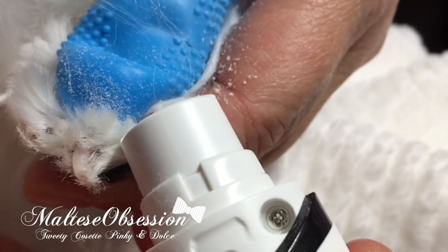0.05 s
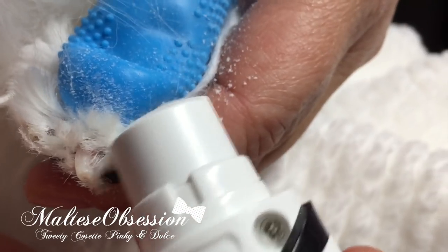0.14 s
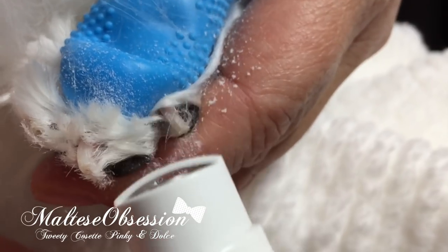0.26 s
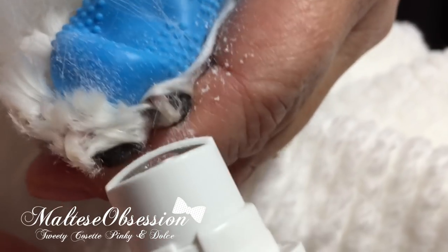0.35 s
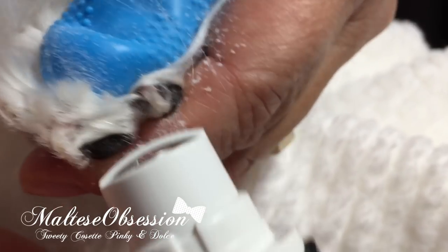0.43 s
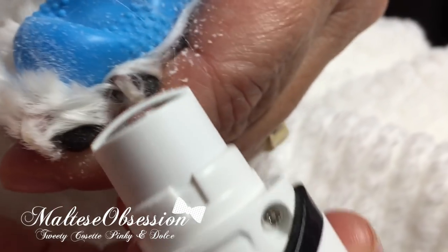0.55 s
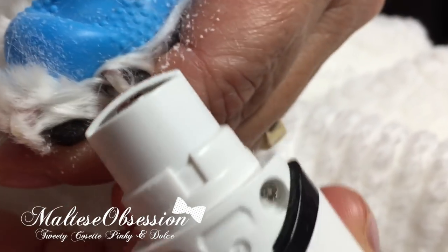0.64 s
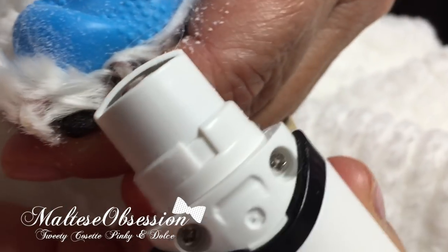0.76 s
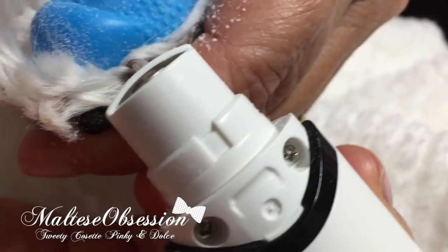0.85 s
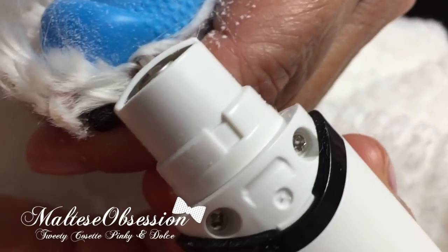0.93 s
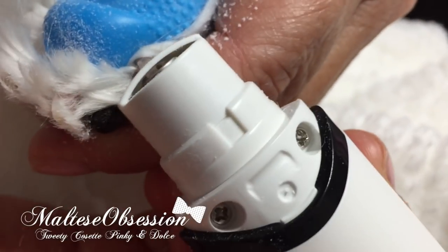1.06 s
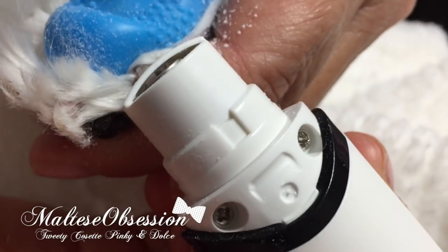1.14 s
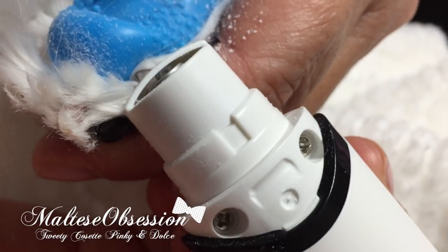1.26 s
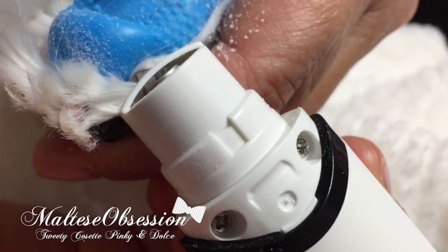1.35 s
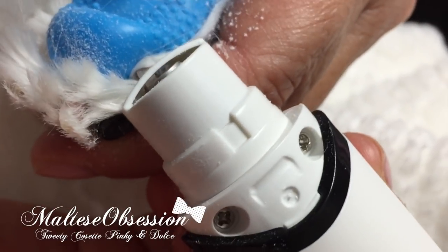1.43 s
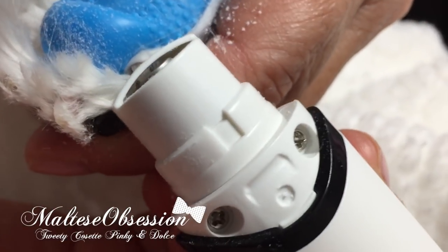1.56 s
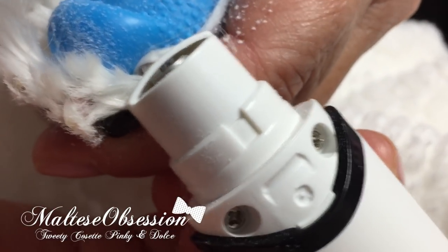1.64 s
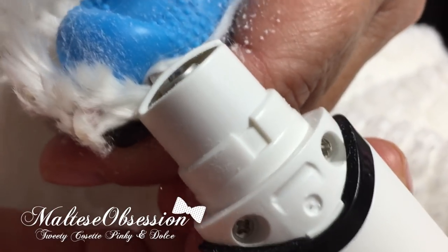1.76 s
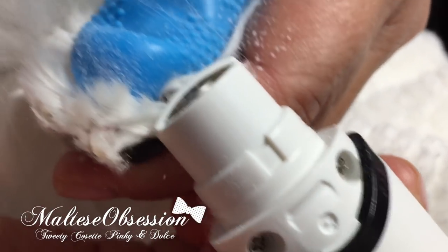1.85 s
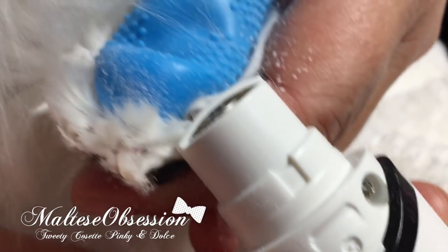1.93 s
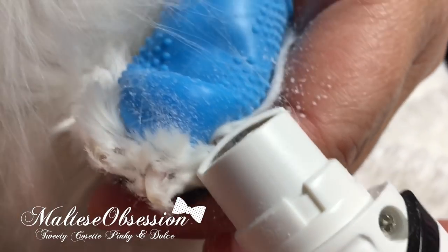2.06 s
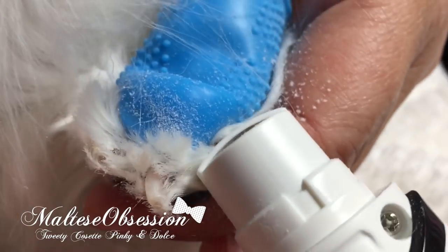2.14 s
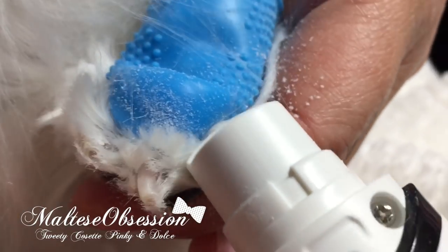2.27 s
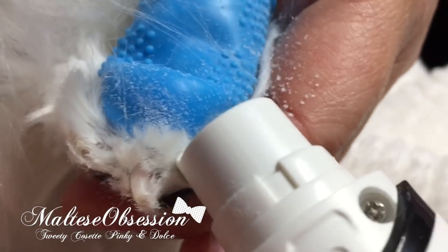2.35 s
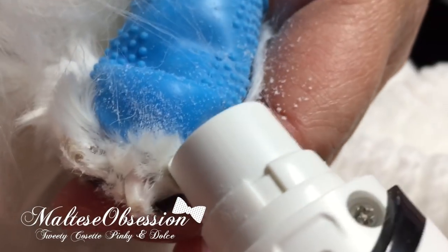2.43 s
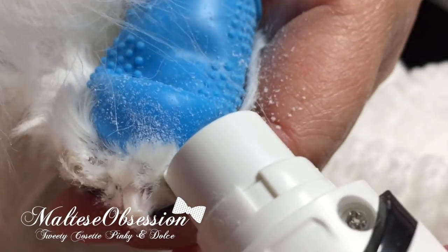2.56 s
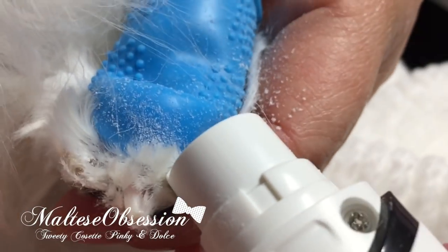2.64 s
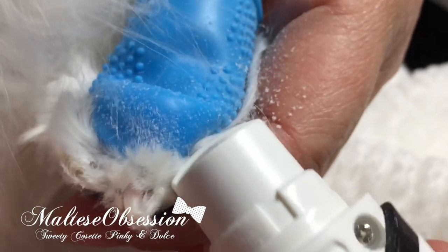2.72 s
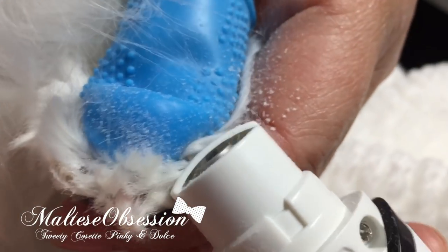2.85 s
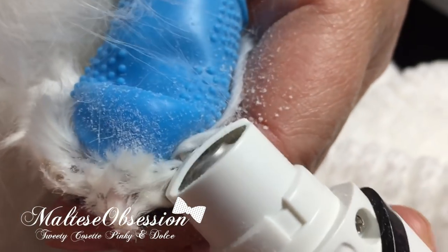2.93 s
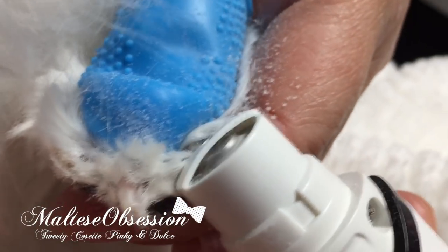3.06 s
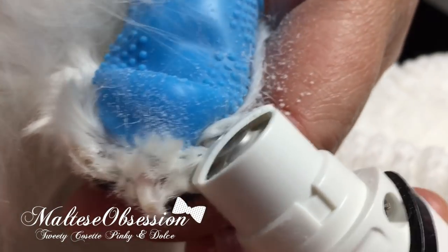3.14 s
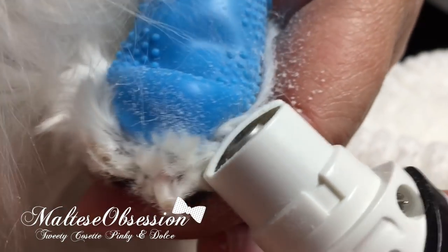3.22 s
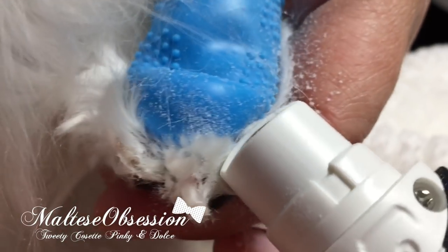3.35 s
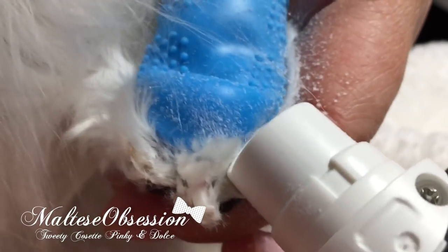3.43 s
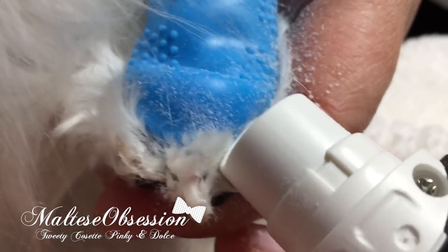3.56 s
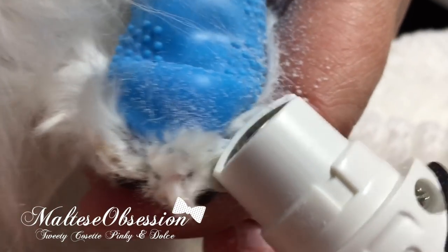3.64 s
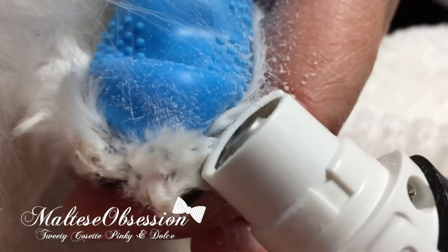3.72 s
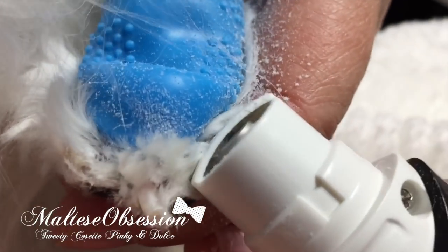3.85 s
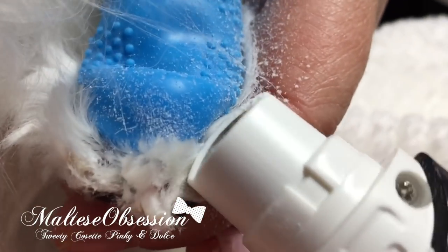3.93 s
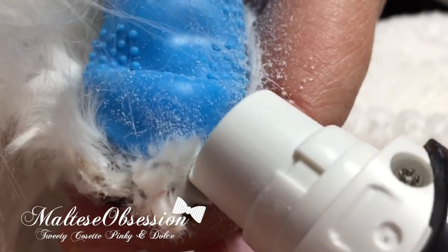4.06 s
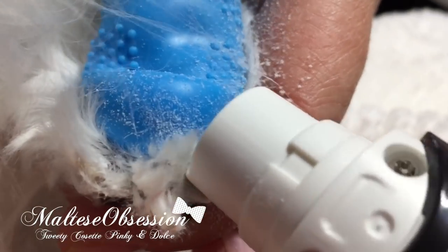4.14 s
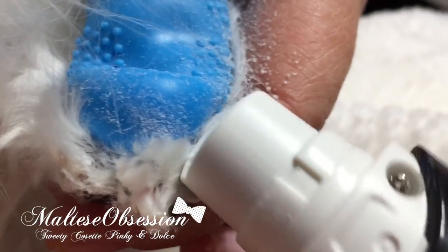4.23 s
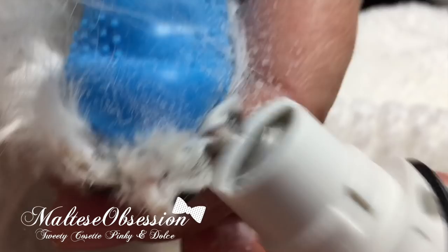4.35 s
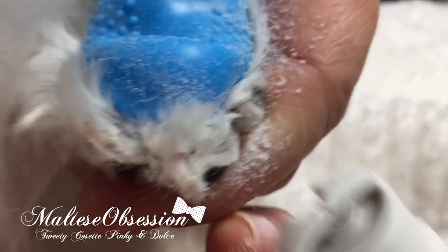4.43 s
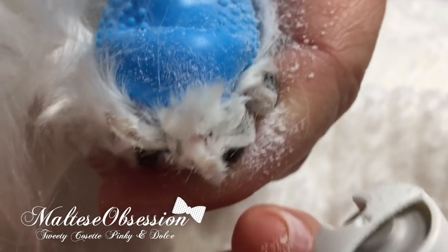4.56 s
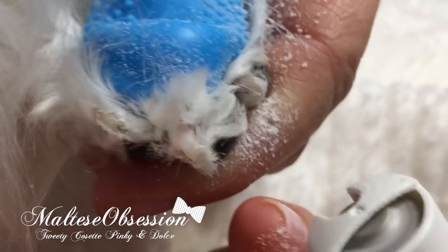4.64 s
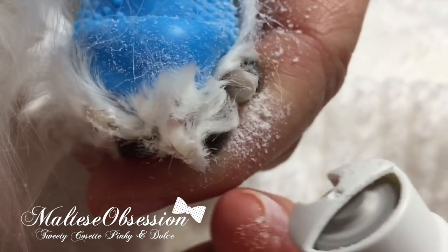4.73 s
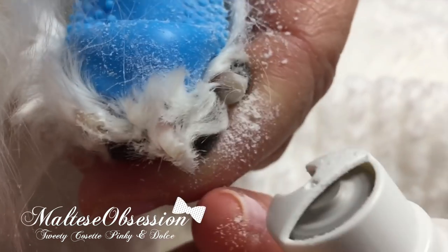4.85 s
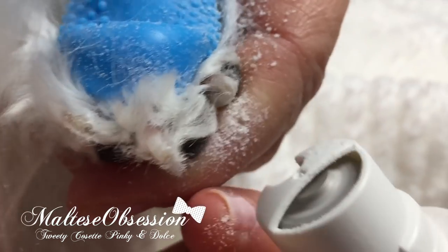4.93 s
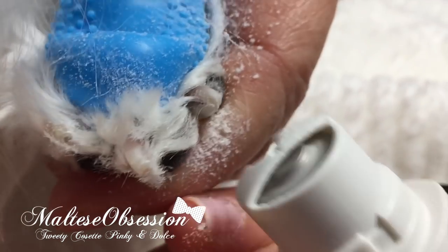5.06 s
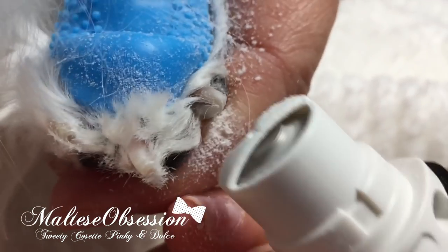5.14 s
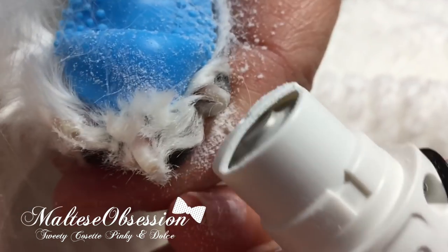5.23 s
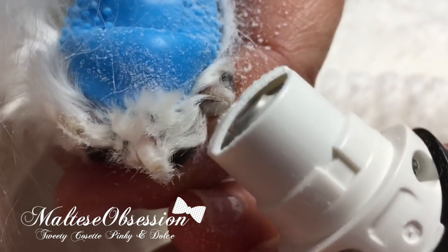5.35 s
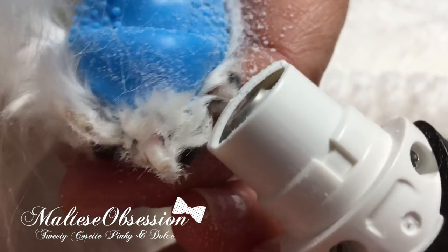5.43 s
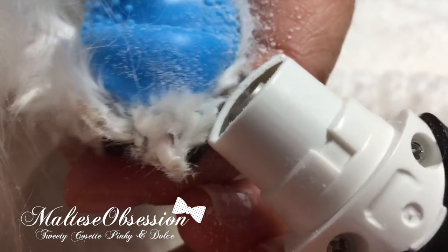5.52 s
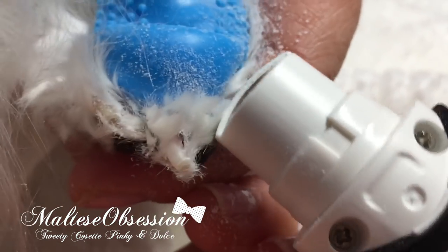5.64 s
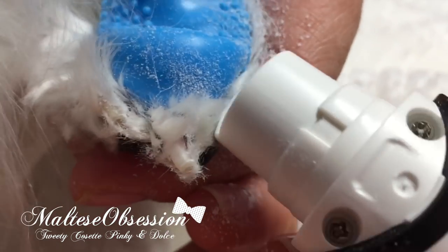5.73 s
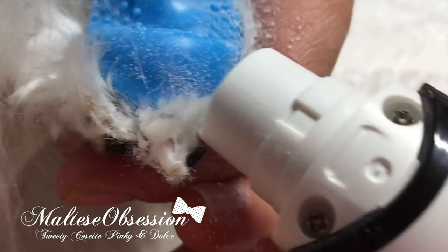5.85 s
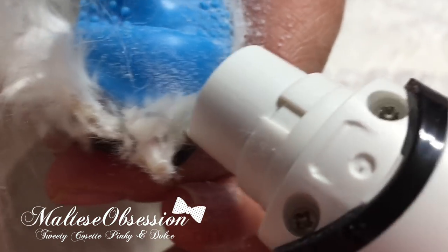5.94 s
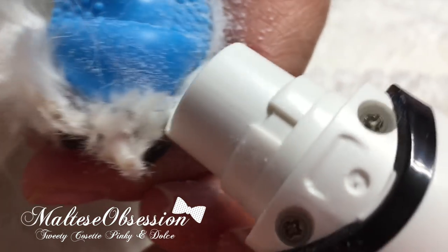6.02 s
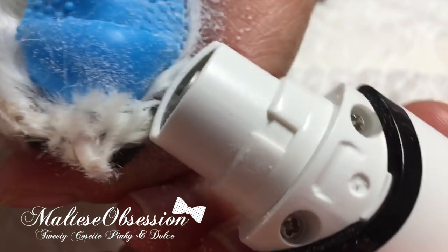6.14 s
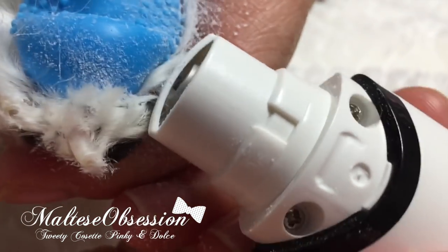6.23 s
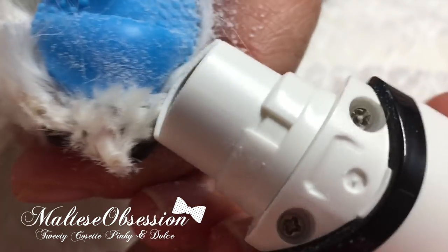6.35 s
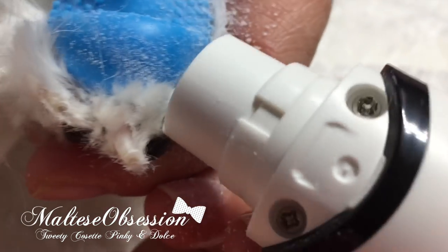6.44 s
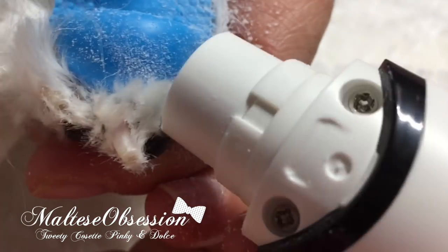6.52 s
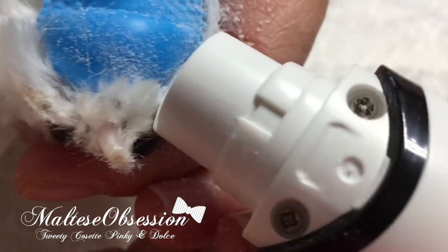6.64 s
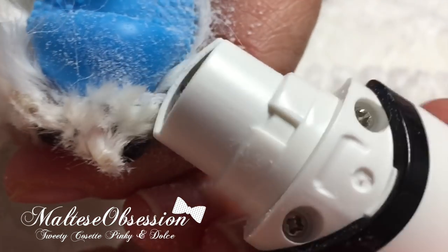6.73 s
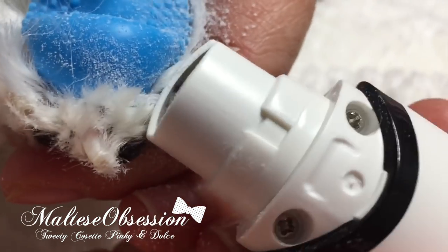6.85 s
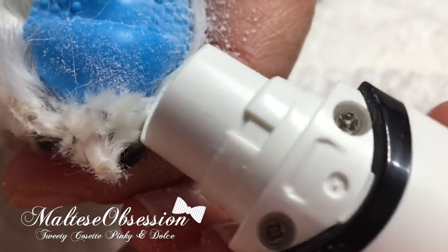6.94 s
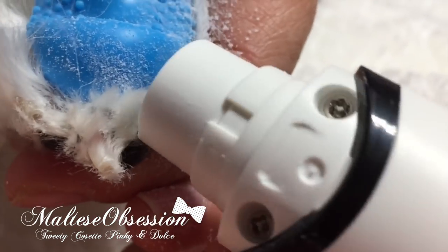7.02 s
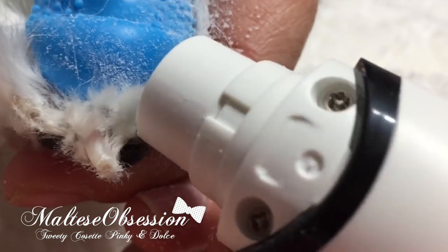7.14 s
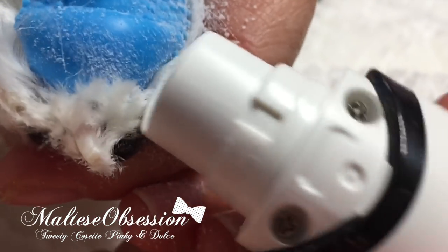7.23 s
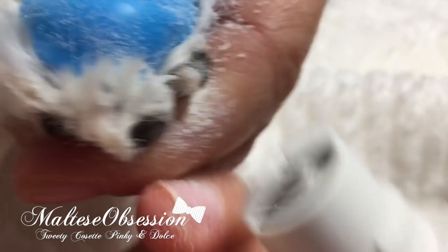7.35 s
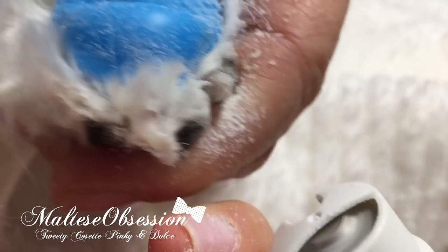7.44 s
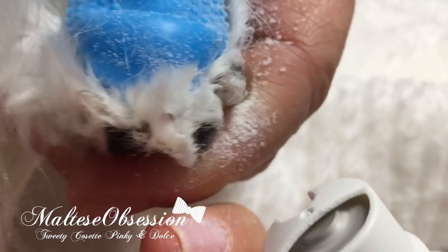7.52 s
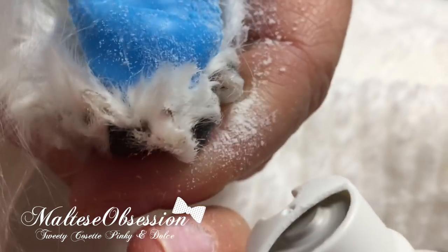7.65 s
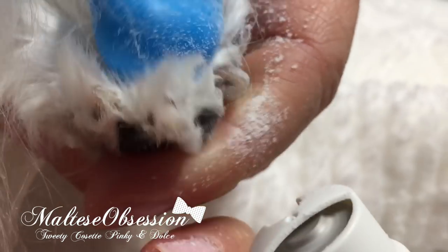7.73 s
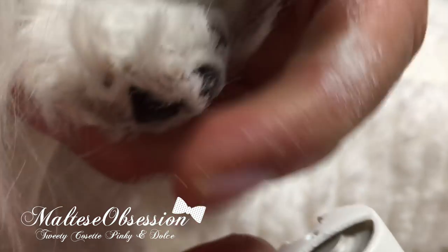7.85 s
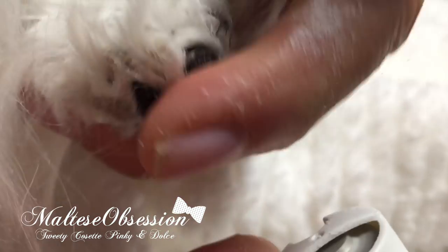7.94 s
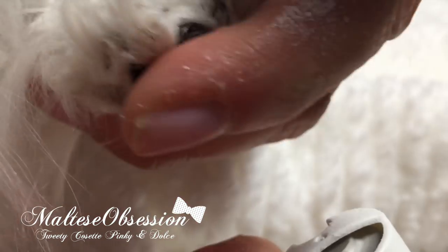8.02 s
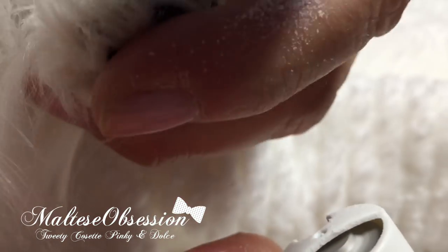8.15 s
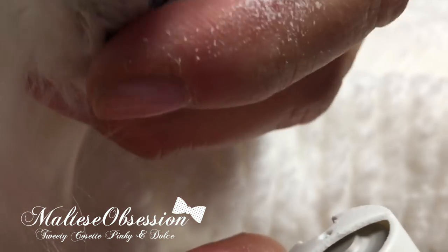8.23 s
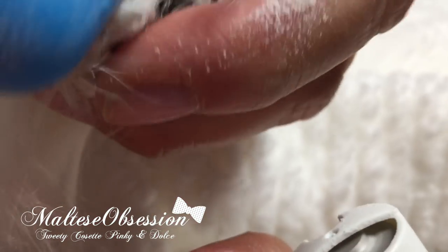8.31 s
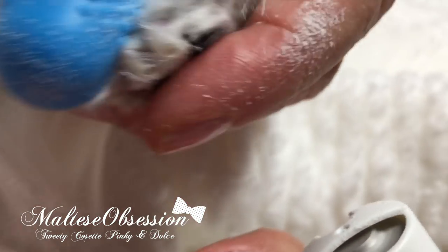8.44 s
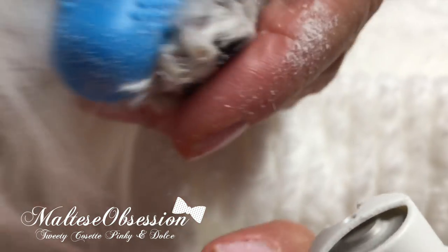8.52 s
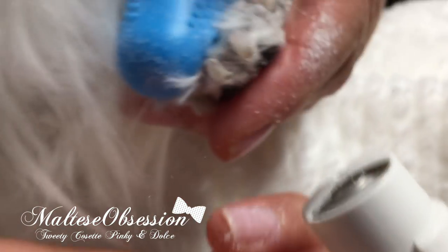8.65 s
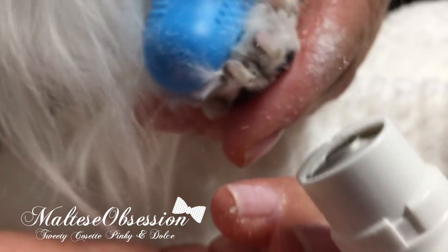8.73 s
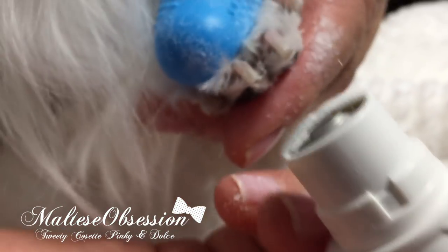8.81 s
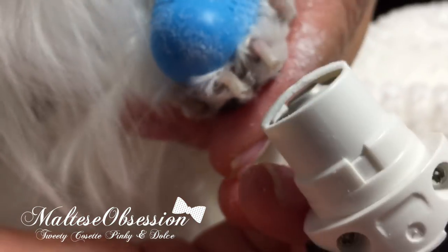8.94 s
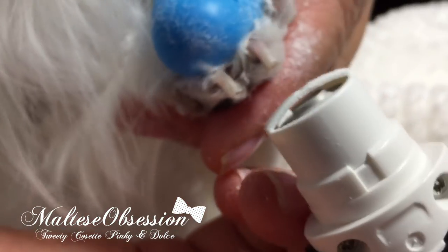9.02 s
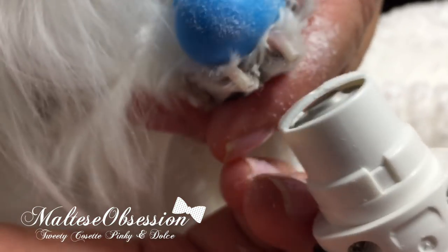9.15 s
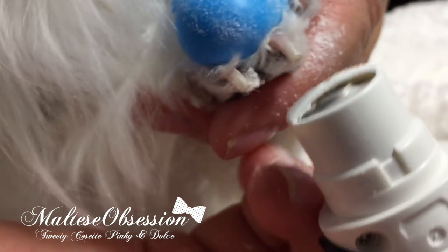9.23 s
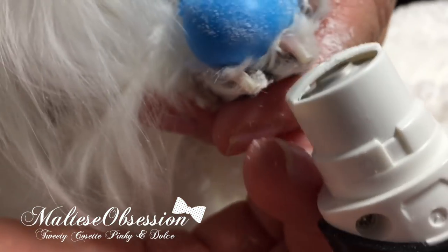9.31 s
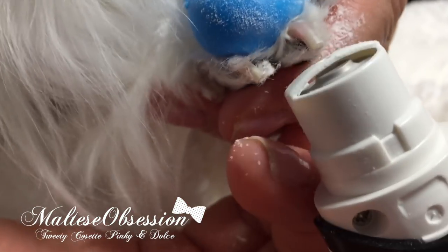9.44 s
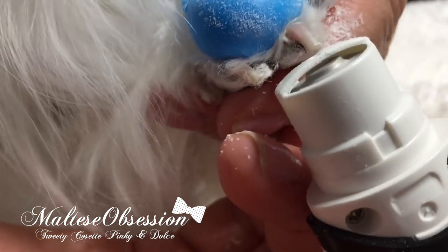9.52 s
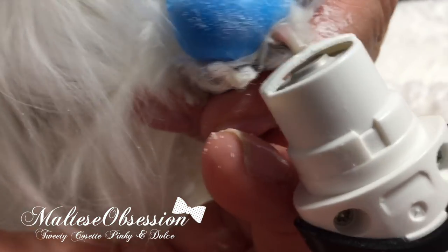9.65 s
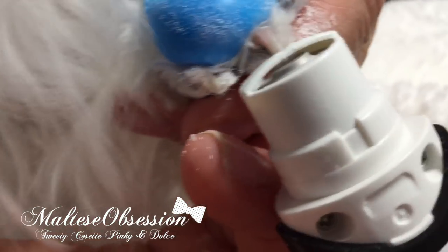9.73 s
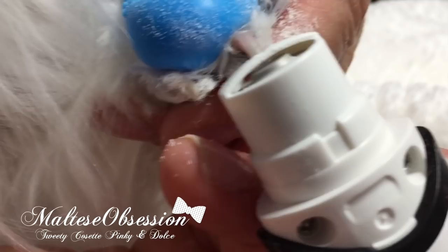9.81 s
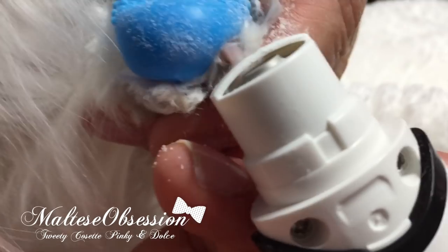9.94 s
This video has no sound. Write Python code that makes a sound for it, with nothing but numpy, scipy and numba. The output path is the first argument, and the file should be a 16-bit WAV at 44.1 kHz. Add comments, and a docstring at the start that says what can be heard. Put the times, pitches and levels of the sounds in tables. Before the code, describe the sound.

A small handheld grinder runs very close in a quiet room. It opens on a short raspy contact with chattering skips, idles with a thin hum and buzz, then sands a nail for over three seconds, its pitch sagging as grit rasps and hisses. It idles again amid soft finger rustles, grinds a third, harsher pass, then hums quietly to the end with a few light ticks.

```python
"""Dog nail grinding

A small battery nail grinder, close by, sands a dog's nails in three passes and idles between them.
The motor hums and its brushes buzz once a turn; pressing on the nail slows it from about 122 to 60 turns a second.
Much the same grit meets the nail on every turn and rings nail, guard and shell; now and then the nail chatters.
Fingers rustle and tick on the paw and the plastic body, over a quiet room."""
import sys
import numpy as np
from scipy import signal
from scipy.fft import rfft, irfft, next_fast_len
from scipy.io import wavfile
from scipy.ndimage import uniform_filter1d
from numba import njit

SR = 44100
rng = np.random.default_rng(int(sys.argv[2]) if len(sys.argv) > 2 else 0)


def waveform_to_disk(signal):
    """Save audio, clipped to [-1, 1], as 16-bit WAV at the path in sys.argv[1]."""
    frames = np.transpose(np.atleast_2d(signal))
    scaled = np.clip(frames, -1, 1) * 32767
    samples = np.round(scaled).astype(np.int16)
    wavfile.write(sys.argv[1], SR, samples)


N = 440118

# Where a source has a trim in its function, the levels listed here are before that trim.

# Harmonics of the free-running hum. Each row: multiple of the shaft speed, relative level in dB.
HUM_ORDERS = [(1, -3), (2, -33), (3, -21.5), (5, -25.5), (6, -34.5), (7, -20), (8, -35), (9, -5.5),
              (10, -16), (11, -8), (12, -11.5), (13, -3.5), (14, -4), (15, 4), (16, -16.5), (17, -2.5),
              (18, -12), (19, -7.5), (20, -8), (21, -20), (22, -21.5), (23, -16.5), (24, -14), (25, -23),
              (26, -17), (27, -15.5), (28, -25.5), (29, -15), (30, -25), (31, -15), (33, -20.5),
              (36, -16.5), (39, -24.5), (42, -20), (44, -22), (45, -18.5), (48, -24), (55, -31.5)]
# How well the housing radiates the hum. Each row: frequency in Hz, gain in dB.
HOUSING = [(55, -63), (85, -20), (122, -7), (220, -30.5), (370, -28), (560, -30.5), (800, -31), (1150, -8),
           (1750, -10), (2700, -4), (4200, -3)]
# The free motor as the hand turns it, one table per pause.
# Each row: time in seconds, shaft speed in Hz, hum level in dB, brush buzz level in dB.
IDLE = [
    [(0.3, 122.4, -64, -73.5), (0.55, 122.5, -63, -71.5), (0.85, 123.1, -64, -73),
     (0.98, 123.1, -66.5, -70)],
    [(4.52, 122.4, -68, -69.5), (4.7, 122.2, -67, -67.5), (5.1, 122.4, -66.5, -67.5),
     (5.55, 122.2, -63.5, -68.5)],
    [(7.44, 122, -67.5, -70), (7.7, 121.8, -66, -67.5), (8.2, 122.6, -65, -69), (8.6, 122.7, -66, -68.5),
     (8.95, 122.8, -65.5, -72.5), (9.3, 122, -66, -72), (9.6, 122.6, -66.5, -71.5), (9.95, 121.8, -65, -72)],
]
# Colour of the brush buzz. Each row: frequency in Hz, gain in dB.
BRUSH = [(800, -42), (2000, -23), (3000, -18), (3700, -16), (4200, -21), (4950, -20), (5400, -9),
         (6000, -10), (6550, -18), (7400, -15), (8200, -23), (9000, -15), (10300, -18), (11000, -9),
         (12000, -2), (12600, -2), (13600, -5), (14500, -9), (15600, -10)]
# The guard's opening is raised and the buzz brightens. Each row: start in seconds, end in seconds, level in dB.
LIFTS = [(0.3, 0.99, -85.5), (4.6, 5.569, -89), (8.712, 9.983, -85)]
# Resonances of that opening. Each row: frequency in Hz, width in Hz, level in dB.
OPENING = [(6600, 830, 0.34), (7800, 11000, -1.3)]
# How far the grinder's head is from the paw. Each row: time in seconds, distance in cm.
PAW_CM = [(0.25, 3.3), (0.5, 4), (1.0, 1.91), (4.43, 2.41), (4.65, 7.3), (5.05, 5.9), (5.55, 2),
          (7.35, 1.89), (7.6, 6.95), (8.55, 7), (8.95, 4.4), (9.4, 4.8), (9.95, 2.6)]
# The nail brakes the shaft, one table per pass. Each row: time in seconds, shaft speed in Hz.
PASSES = [
    [(0.0, 84.7), (0.17, 81.9), (0.235, 93.2)],
    [(1.0, 122.2), (1.13, 104.4), (1.2, 102.9), (1.4, 82.4), (1.45, 84.4), (1.56, 89.8), (1.67, 86.1),
     (1.76, 89.3), (1.89, 84), (1.96, 86.7), (2.07, 73.8), (2.15, 73.1), (2.2, 80.65), (2.33, 83.1),
     (2.39, 75.3), (2.49, 70.5), (2.56, 69), (2.64, 61.7), (2.72, 59.76), (2.77, 61.7), (2.82, 69.6),
     (2.89, 65), (3.12, 77.27), (3.2, 76.2), (3.23, 74.1), (3.27, 73.9), (3.4, 66.5), (3.49, 69.4),
     (3.52, 74.2), (3.58, 67.9), (3.66, 68.5), (3.77, 78.65), (3.9, 81.4), (4.02, 72.5), (4.06, 64.4),
     (4.09, 62.7), (4.15, 64.35), (4.21, 72.2), (4.27, 69.6), (4.35, 88.5), (4.4, 90), (4.44, 104)],
    [(5.57, 121.5), (5.73, 112.4), (5.79, 101.2), (5.85, 103.2), (5.95, 95.9), (6.04, 95.2), (6.1, 88.9),
     (6.32, 94.2), (6.41, 79.6), (6.59, 93.8), (6.67, 90.1), (6.77, 79.9), (6.83, 83.9), (6.94, 68.2),
     (7.0, 68.64), (7.18, 97.9), (7.32, 93.9), (7.35, 102.8)],
]

# Bouts in which the nail skips on the drum once a turn.
# Each row: start in seconds, length in seconds, burst level in dB, drum's high ping in dB relative to the burst.
SKIPS = [(0.0064, 0.055, -34, -7), (0.088, 0.075, -34, -6), (0.17, 0.004, -29, -4), (0.186, 0.004, -29, -7),
         (0.199, 0.004, -28.5, -1), (0.995, 0.004, -35.5, -10), (1.29, 0.05, -36, 4.5),
         (1.304, 0.02, -40, 6), (1.929, 0.004, -32, 3), (1.9363, 0.004, -57, -2), (5.7484, 0.004, -29, -2)]
# The drum brushes the nail once a turn. Each row: start in seconds, length in seconds, burst level in dB.
TOUCHES = [(5.5726, 0.004, -48), (5.5801, 0.03, -41.5), (5.6645, 0.02, -46.5)]
# Resonances rung by the skips and handling ticks. Each row: frequency in Hz, width in Hz, level in dB.
CHATTER_MODES = [(1450, 570, -8), (3050, 940, -5.5), (6000, 1100, -3), (8660, 1400, 0), (11260, 600, -10),
                 (12200, 890, 2)]
# The drum's high ping. Each row: frequency in Hz, width in Hz, level in dB.
PING = [(7460, 400, 9.5)]

# Each way the nail lies on the drum; levels hold at the usual drag with the drum lying flat.
# Each row: start in seconds, end in seconds, rasp in dB, push on the shell in dB, bite in dB, dust hiss in dB,
# toe thump in dB, balance of the 11 kHz over the 12 kHz ring in dB, bite growth in dB per second,
# once-a-turn wobble depth as a natural-log gain.
CONTACTS = [ (0.008, 0.227, -59.5, -53.5, -63, -61, -84, -7, 1, 0.079),
            (0.997, 1.931, -56, -57.5, -82, -58.5, -99, 15, -20, 0.16),
            (1.929, 2.149, -57.5, -58, -57, -50.5, -90, 4, 10, 0.12),
            (2.147, 2.325, -58, -50, -55, -48, -86, -4, 10, 0.53),
            (2.324, 2.834, -58, -51, -52.5, -53, -80.5, 9, -6, 0.16),
            (2.822, 3.304, -57.5, -53, -52, -50.5, -82, 4, 0, 0.12),
            (3.3, 4.425, -62, -55, -50.5, -53, -75, 2.5, -1, 0.17),
            (5.613, 5.659, -55.5, -50, -75, -69, -82, 6, 3, 0.091),
            (5.656, 5.746, -62, -52, -61, -56, -87, 6, 70, 0.53),
            (5.747, 5.86, -77, -51, -42.5, -49.5, -77.5, -10, -21, 0.13),
            (5.855, 6.165, -76, -51, -42.5, -52, -74.5, -11.5, -6, 0.22),
            (6.16, 7.343, -61, -53, -47.5, -51.5, -73.5, -5.5, -0.5, 0.15), ]
# The hand rocks the drum towards the nail's edge and back.
# Each row: middle in seconds, length in seconds, tilt from 0 to 1.
ROCKS = [(2.47, 0.62, 0.35), (2.9, 0.31, 0.62), (3.41, 0.66, 0.56), (3.77, 0.38, 0.69), (3.98, 0.3, 0.66),
         (4.38, 0.19, 0.9), (5.76, 0.058, 0.9), (6.32, 0.61, 1.0), (6.86, 0.54, 0.85), (7.32, 0.075, 0.86)]
# The hand presses harder or eases off. Each row: middle in seconds, length in seconds, change in dB.
PRESSES = [(2.155, 0.058, -3.5), (2.22, 0.11, -1), (2.78, 0.13, 0), (3.17, 0.53, -2.5), (3.88, 0.22, -1),
           (4.2, 1, 2.5), (5.752, 0.011, 3), (5.78, 0.059, 4), (5.84, 0.042, -4.5), (6.1, 0.12, 1),
           (6.55, 0.11, 1.5), (7.165, 0.048, -5), (7.29, 0.23, 1.5)]
# Brief level changes of one layer: rasp, shell ring, low nail ring or high nail ring.
# Each row: middle in seconds, length in seconds, change in dB.
RASP_SWELLS = [(1.13, 0.44, 0.5), (1.37, 0.24, -2.5), (6.36, 0.26, 1), (6.58, 0.37, -15),
               (7.14, 0.19, -0.5)]
SHELL_SWELLS = [(3.55, 0.18, 6), (4.2, 0.28, 3), (6.17, 0.18, 3), (6.68, 0.13, 4), (6.97, 0.2, -2),
                (7.2, 0.25, 3)]
NAIL_LOW_SWELLS = [(2.74, 0.27, 5), (3.9, 0.22, -10), (5.71, 0.14, -7), (5.98, 0.29, -2), (6.57, 0.1, 0)]
NAIL_RING_SWELLS = [(0.08, 0.44, 5), (2.48, 0.37, -18), (6.3, 0.16, -10.5), (7.29, 0.17, 2)]
# Colours of the coarse rasp and the fine dust hiss. Each row: frequency in Hz, gain in dB.
RASP = [(200, -27.5), (600, -45.5), (850, -5), (1200, 6), (2000, 12.5), (2800, -2), (3600, 10.5),
        (4500, 11.5), (4870, 5.5), (5500, 12.5), (6300, 5), (7300, 6.5), (8200, -3.5), (15000, 2)]
HISS = [(900, -52), (3000, -20), (5300, 5), (7500, -13), (8400, 9), (10500, -1), (13200, -0.5),
        (15700, 0.5)]
# The shell's resonance, lower under a firm nail: Hz when light, Hz when firm, width in Hz.
SHELL_RING_HZ = (1930, 1744, 718)
# The nail's lowest and upper resonances: Hz lying flat, Hz fully tilted, width in Hz.
NAIL_LOW_HZ = (3010, 2880, 583)
NAIL_RING_HZ = (6360, 5810, 1230)
# Resonances of the guard's mouth.
# Each row: Hz lying flat, Hz fully tilted, width in Hz, dB lying flat, dB fully tilted.
DUST_RINGS = [(8600, 8000, 1500, -4.5, -17.5), (9730, 9100, 620, -7.5, -6), (11300, 11360, 1530, -5.5, -8),
              (11930, 12400, 1300, -6.5, -9), (14700, 22000, 3600, -10.5, 3)]
# The guard's cup rings hollow while the toe covers it. Each row: middle in seconds, length in seconds, level in dB.
HOLLOWS = [(0.103, 0.29, -57.5), (1.113, 0.53, -58), (2.232, 0.094, -56), (5.629, 0.06, -52.5)]
# The cup's and the toe's resonances. Each row: frequency in Hz, width in Hz, level in dB.
CUP = [(1390, 360, 2)]
TOE = [(365, 113, -5)]
# A nail held on its edge squeals.
# Each row: start in seconds, end in seconds, starting level in dB, growth in dB per second.
SQUEALS = [(1.941, 2.247, -39.5, -23), (2.836, 2.954, -53, 3)]
# Guard resonances that colour the squeal. Each row: frequency in Hz, width in Hz, level in dB.
GUARD = [(6184, 610, 15.5), (7250, 860, 4), (8580, 507, 2), (9410, 390, -1), (11950, 700, 8.5),
         (12400, 800, 6.5)]

# Fingers rub. Each row: middle in seconds, length in seconds, level in dB.
RUSTLES = [(0.59, 0.26, -71), (4.663, 0.26, -74.5), (4.984, 0.32, -76), (5.362, 0.38, -78),
           (7.884, 0.036, -78), (8.57, 0.032, -80), (8.878, 0.16, -87), (9.736, 0.06, -85)]
# Faint handling ticks. Each row: start in seconds, burst level in dB.
TICKS = [(7.883, -59), (8.573, -62), (8.908, -60), (9.455, -62), (9.73, -67), (9.778, -52)]
# Body resonances under the fingers. Each row: frequency in Hz, width in Hz, level in dB.
GRIP = [(960, 120, 3.2), (2060, 1300, -2), (3060, 580, -9)]
# Colour of the quiet room. Each row: frequency in Hz, gain in dB.
ROOM = [(25, -12), (70, 1), (160, -7), (235, -1.5), (290, -9), (550, -20), (900, -16), (1700, -1),
        (2600, -7), (4500, -16), (9000, -23), (15000, -23)]

FREE_HZ = 122.3  # reference speed of the unloaded shaft
SPIN_UP_S = .042  # time constant of the recovery once the nail lifts off
RELEASE_S = 0.01  # time constant with which a held sound or contact dies
LIFT_S = 0.2  # time the hand takes to raise the opening
USUAL_DRAG = 0.44  # share of the speed lost at which the contact levels hold
FIRM_BITE_DB = -51  # the bite at which the toe is firmly coupled to the drum
RING_DRIFT, RING_FLICKER_DB = 0.007, 1.8  # wander of pitch as a share, and of the mouth's level
PATCHY_DB = 1.02  # each of the nail's rings swells and fades on its own
ROOM_DB, TOP_HZ, SOUND_CM_S = -81, 15850, 34300

T = np.arange(N) / SR
SIZE = next_fast_len(N + 8192, real=True)
FREQ = np.maximum(np.arange(SIZE // 2 + 1) * SR / SIZE, 1)


def amp(db):
    """Decibels to gain."""
    return 10 ** (np.asarray(db) / 20)


def unit(x):
    """Scale to rms 1."""
    return x / np.sqrt(np.mean(x ** 2))


def curve(rows, axis=1):
    """One column of a table, joined by straight lines in time."""
    rows = np.asarray(rows)
    return np.interp(T, rows[:, 0], rows[:, axis])


def walk(rate, step=1):
    """Slow random wander with a spread near 1, taking rate steps a second."""
    steps = rng.standard_normal(1024)
    return 1.3 * np.interp(T[::step] * rate, np.arange(len(steps)), steps)


def swells(events):
    """A smooth rise and fall for each (middle s, length s, height) event."""
    out = np.zeros(N)
    for s, length, height in events:
        start, end = np.searchsorted(T, [s - length / 2, s + length / 2])
        out[start:end] += height * np.cos(np.pi * (T[start:end] - s) / length) ** 2
    return out


def held(start, end, ramp_s=0.0025):
    """Gain that rises around the start, holds and dies away after the end."""
    rise = np.clip((T - start) / ramp_s + .5, 0, 1)
    return rise * np.exp(-np.clip((T - end) / RELEASE_S, 0, 60))


def slope(points, hz):
    """Level in dB of a (Hz, dB) spectrum at any frequency."""
    f, db = np.transpose(points)
    return np.interp(np.log(hz), np.log(f), db)


def colour(x, gain):
    """Causal (minimum-phase) filter with the given gain at each frequency."""
    cepstrum = irfft(np.log(gain + 1e-5), SIZE)
    # folding the cepstrum forward in time gives the minimum phase
    cepstrum[1:SIZE // 2] *= 2
    cepstrum[SIZE // 2 + 1:] = 0
    return irfft(rfft(x, SIZE) * np.exp(rfft(cepstrum)), SIZE)[:N]


def shaped(x, points):
    """Sound coloured by a spectrum."""
    return colour(x, amp(slope(points, FREQ)))


def ring(x, modes):
    """Sound passed through steep-sided resonances."""
    gain = 0
    for hz, width, db in modes:
        detune = (FREQ ** 2 - hz ** 2) / (FREQ * width)
        gain = gain + amp(db) / (1 + detune ** 2)
    return colour(x, gain)


@njit
def moving_band(x, hz, width):
    """State-variable band-pass whose centre moves."""
    y, band, low = np.empty(len(x)), 0., 0.
    for i in range(len(x)):
        g, damping = np.tan(np.pi * hz[i] / SR), width / hz[i]
        v = (band + g * (x[i] - low)) / (1 + g * (g + damping))
        band, low, y[i] = 2 * v - band, low + 2 * g * v, damping * v
    return y


def sliding(x, resonance, share):
    """A steep, slightly wandering resonance, at its first Hz for share 0 and its second for share 1; rms 1."""
    rest, moved, width = resonance
    hz = (rest + (moved - rest) * share) * (1 + RING_DRIFT * walk(10))
    once = moving_band(x, hz, float(width))
    return unit(moving_band(once, hz, float(width)))


def rough_surface(turns, memory_turns, fresh, slip_us, count):
    """Clicks from bumps fixed round a shaft: they return each turn, wear slowly, and are partly new each time."""
    laps = int(turns[-1]) + 1
    angle = (np.arange(count) + rng.random(count)) / count
    wear, chance, slip = rng.standard_normal((3, 1400, count))
    keep = np.exp(-1 / max(memory_turns, 1))
    first = rng.standard_normal((1, count))
    worn = signal.lfilter([np.sqrt(1 - keep ** 2)], [1, -keep], wear, axis=0, zi=first)[0]
    # the slower the shaft, the more the nail tears and slips
    lap_s = np.gradient(np.interp(np.arange(laps), turns, T))
    labour = (FREE_HZ * lap_s)[:, None] ** 1.3
    height = (worn[:laps] + fresh * labour * chance[:laps]) / np.hypot(1, fresh * labour)
    when = np.interp(np.arange(laps)[:, None] + angle, turns, T, right=-1)
    when = when + 1e-6 * slip_us * labour * slip[:laps]
    place, height = when[when > 0] * 2 * SR, height[when > 0]
    # twice oversampled, each click shared by two samples
    index, part = place.astype(int), place % 1
    clicks = np.bincount(index, height * (1 - part), 2 * SIZE)
    clicks = clicks + np.bincount(index + 1, height * part, 2 * SIZE)
    return signal.resample_poly(clicks, 1, 2)[:N]


def room():
    """Steady coloured noise of a quiet room."""
    return amp(ROOM_DB) * unit(shaped(rng.standard_normal(N), ROOM))


def shaft_speed():
    """The nail brakes the shaft during a pass; afterwards the motor spins up to its free speed."""
    free = curve(np.vstack(IDLE))
    lost = np.zeros(N)
    for rows in PASSES:
        start, end = rows[0][0], rows[-1][0]
        lost += (T >= start) * (free - curve(rows)) * np.exp(-np.maximum(T - end, 0) / SPIN_UP_S)
    return uniform_filter1d(free - lost, size=900)


def motor_hum(hz, turns, waver_db=1.0, load_db=-9, muffle_db=-4, stagger_db=4):
    """Shaft harmonics slide through the housing's resonances and weaken under load."""
    slow_hz = hz[::64]  # gains are worked out every 64 samples
    load = np.clip(2 * (1 - slow_hz / FREE_HZ), 0, 1)
    hum = np.zeros(N)
    for k, db in HUM_ORDERS:
        housing_db = slope(HOUSING, k * slow_hz) - slope(HOUSING, k * FREE_HZ)
        # under load the overtones weaken further and every order comes and goes
        loaded_db = load * (load_db + muffle_db * (k > 1) + stagger_db * walk(12, step=64))
        level_db = db + housing_db + loaded_db + waver_db * walk(5, step=64)
        gain = np.interp(T, T[::64], amp(level_db))
        # two opposite magnetic kicks a turn line up the odd orders; the even ones lie a quarter cycle off
        offset = (k % 2 == 0) / 4 + .07 * rng.standard_normal()
        # the housing delays each frequency differently and spreads every kick into a short burst
        spread = .012 * k ** 2
        hum += gain * np.sin(2 * np.pi * (k * turns + offset + spread))
    return hum / np.sqrt(sum(amp(db) ** 2 for k, db in HUM_ORDERS) / 2)


def paw_echo(x, echo_db=-14):
    """Sound plus its reflection from the paw and hand: the colour shifts as the grinder moves."""
    delay_s = 2 * curve(PAW_CM) / SOUND_CM_S
    return x + amp(echo_db) * np.interp(T - delay_s, T, x)


def motor(hz, turns, hum_db=4.0, buzz_db=-3.5):
    """The shaft hums; brush ticks repeating each turn buzz above it, brighter while the opening is raised."""
    idle = np.vstack(IDLE)
    hum = motor_hum(hz, turns) * amp(curve(idle, axis=2) + hum_db)
    ticks = paw_echo(rough_surface(turns, memory_turns=450, fresh=.1, slip_us=1.5, count=60))
    buzz = unit(shaped(ticks, BRUSH)) * amp(curve(idle, axis=3) + buzz_db)
    raised = sum(amp(db) * held(start, end, ramp_s=LIFT_S) for start, end, db in LIFTS)
    return hum + buzz + raised * unit(ring(ticks, OPENING))


def scrapes(events, length_s):
    """A short burst of friction noise for each (s, dB) event."""
    envelope = np.zeros(N)
    age = np.arange(2048) / SR / length_s
    for s, db in events:
        start = max(int(s * SR), 0)
        envelope[start:start + len(age)] += amp(db) * age * np.exp(1 - age)
    return envelope * rng.standard_normal(N)


def bounces(bouts, turns, scatter_db=0.5):
    """(s, dB) of single knocks, one each turn for as long as a bout lasts."""
    knocks = []
    for s, length, db in bouts:
        chance = rng.standard_normal(16)
        times = np.interp(np.interp(s, T, turns) + np.arange(len(chance)), turns, T)
        knocks += [(t, db + scatter_db * c) for t, c in zip(times, chance) if t <= s + length]
    return knocks


def chatter(turns, skip_db=-1, touch_db=-6):
    """Hard skips on the turning drum ring the guard and the drum's ping; glancing touches only rasp."""
    hits = bounces([(s, length, db) for s, length, db, ping in SKIPS], turns)
    pings = bounces([(s, length, db + ping) for s, length, db, ping in SKIPS], turns)
    skips = ring(scrapes(hits, length_s=0.0011), CHATTER_MODES)
    skips = skips + ring(scrapes(pings, length_s=0.0014), PING)
    touches = shaped(scrapes(bounces(TOUCHES, turns), length_s=0.0011), RASP)
    return amp(skip_db) * skips + amp(touch_db) * touches


def contact(axis):
    """One column of the contacts through time; each takes over from the one before."""
    rows = np.array(CONTACTS)
    edges = np.r_[0, (rows[1:, 0] * SR).astype(int), N]
    return np.repeat(rows[:, axis], np.diff(edges))


def contact_gain(axis):
    """Gain from one dB column of the contacts, dying away when the nail lifts off."""
    release = np.exp(-np.clip((T - contact(axis=1)) / RELEASE_S, 0, 60))
    return uniform_filter1d(amp(contact(axis)) * release, size=130)


def efforts(drag, tilt, rasp_tilt_db=4):
    """Gains of rasp, push, bite and dust: drag raises the last three; tilting trades push and bite for rasp and dust."""
    def response(drag_db, tilt_db):
        return amp(drag_db * (drag - USUAL_DRAG) + tilt_db * tilt)
    growth_db = contact(axis=8) * (np.minimum(T, contact(axis=1)) - contact(axis=0))
    rasp = contact_gain(axis=2) * amp(rasp_tilt_db * tilt)
    push = contact_gain(axis=3) * response(drag_db=12.5, tilt_db=-2.5)
    bite = contact_gain(axis=4) * response(drag_db=7.5, tilt_db=-2.0) * amp(growth_db)
    dust = contact_gain(axis=5) * response(drag_db=18.0, tilt_db=9.5)
    return rasp, push, bite, dust


def nail_rings(coarse, tilt, firm, ring_db=0.5):
    """Coarse grit excites two resonances of the nail, which slide as the drum tilts."""
    # a lightly touched nail rings lower, like a tilted one
    loose = np.maximum(tilt, 2 * (1 - firm) ** 2)
    low_gain = amp(swells(NAIL_LOW_SWELLS) + PATCHY_DB * walk(14))
    high_gain = amp(ring_db + swells(NAIL_RING_SWELLS) + PATCHY_DB * walk(14))
    return low_gain * sliding(coarse, NAIL_LOW_HZ, tilt) + high_gain * sliding(coarse, NAIL_RING_HZ, loose)


def toe_thump(turns, drag, tilt, catch, toe_tilt_db=-7):
    """The eccentric drum thumps the toe's resonance with low shaft harmonics, mostly when it lies flat."""
    lumps = np.zeros(N)
    for k in range(3, 8):
        phase = k * turns + rng.random() + .4 * drag * walk(25)
        lumps += amp(4 * walk(16)) * np.sin(2 * np.pi * phase)
    return contact_gain(axis=6) * amp(toe_tilt_db * tilt) * unit(ring(lumps * catch, TOE))


def dust_hiss(grit, edge_grit, tilt, broad_db=-3):
    """Fine grit hisses; grit at the drum's edge rings the guard's mouth, each resonance shifting and swelling alone."""
    out = amp(broad_db) * unit(shaped(grit, HISS))
    balance = uniform_filter1d(contact(axis=7), size=1500) / 2
    sides = (0, 0, 1, -1, 0)  # the balance lifts the 11 kHz ring and lowers the 12 kHz one
    for (flat, tilted, width, flat_db, tilted_db), side in zip(DUST_RINGS, sides):
        db = flat_db + (tilted_db - flat_db) * tilt + side * balance + RING_FLICKER_DB * walk(11)
        out = out + amp(db) * sliding(edge_grit, (flat, tilted, width), tilt)
    return out


def edge_squeal(coarse):
    """A nail held on its edge drives the guard's resonances, growing or fading steadily."""
    level = np.zeros(N)
    for start, end, db, rate in SQUEALS:
        level += held(start, end) * amp(db + rate * (np.clip(T, start, end) - start))
    return level * unit(ring(coarse, GUARD))


def sanding(hz, turns, drag, rasp_db=5.5, shake_db=-10):
    """Grit scrapes the nail, hardest once a turn; a deeper bite brings out the nail's own resonances."""
    catch = amp((.4 + 1.5 * drag) * walk(45))  # the nail catches and slips a little
    since_touch = turns - np.interp(contact(axis=0), T, turns)
    wobble = contact(axis=9) * np.cos(2 * np.pi * since_touch)
    pressure = catch * np.exp(wobble) * amp(swells(PRESSES))
    skim = pressure * rough_surface(turns, memory_turns=16, fresh=.24, slip_us=4.5, count=70)
    coarse = pressure * rough_surface(turns, memory_turns=22, fresh=.13, slip_us=7.5, count=55)
    fine = pressure * rough_surface(turns, memory_turns=16, fresh=.35, slip_us=3, count=160)
    edge = pressure * rough_surface(turns, memory_turns=16, fresh=.35, slip_us=3, count=160)
    # the shell is shaken through the bearing, by its own pattern of knocks
    knocks = pressure * rough_surface(turns, memory_turns=12, fresh=.22, slip_us=14, count=40)
    tilt = swells(ROCKS)
    rasp, push, bite, dust = efforts(drag, tilt)
    firm = np.clip(bite / amp(FIRM_BITE_DB), 0, 1)

    rasping = amp(rasp_db + swells(RASP_SWELLS)) * rasp * unit(shaped(skim, RASP))
    shell = amp(swells(SHELL_SWELLS)) * push * sliding(knocks, SHELL_RING_HZ, np.sqrt(firm))
    hollow = swells([(s, length, amp(db)) for s, length, db in HOLLOWS]) * unit(ring(skim, CUP))
    # the eccentric drum also rocks the housing
    shake = amp(shake_db + slope(HOUSING, hz)) * np.sin(2 * np.pi * turns)
    biting = bite * (nail_rings(coarse, tilt, firm) + shake)
    thump = toe_thump(turns, drag, tilt, catch)
    hiss = dust * dust_hiss(fine, edge, tilt)
    return rasping + shell + hollow + biting + thump + hiss + edge_squeal(coarse)


def handling(tick_db=-3, knock_db=-4):
    """Fingers rub the paw and plastic body as fluttering noise; short ticks ring the guard and knock the body."""
    moves = swells([(s, length, amp(db)) for s, length, db in RUSTLES])
    rustle = moves * amp(3.3 * walk(26)) * unit(ring(rng.standard_normal(N), GRIP))
    ticks = scrapes(TICKS, length_s=0.0017)
    return rustle + amp(tick_db) * ring(ticks, CHATTER_MODES) + amp(knock_db) * ring(ticks, GRIP)


def scene():
    """One shaft drives the motor and the drum, over a quiet room."""
    hz = shaft_speed()
    drag = np.clip(1 - hz / FREE_HZ, 0, 1)
    # the nail's drag makes the speed unsteady
    hz = hz * (1 + (.0004 + .005 * drag + .04 * drag ** 3) * walk(35))
    turns = np.cumsum(hz) / SR
    return (room() + motor(hz, turns) + chatter(turns) + sanding(hz, turns, drag) + handling())[None]


def record(dry):
    """A steep elliptic low-pass cuts the top."""
    return signal.sosfilt(signal.ellip(10, .2, 70, TOP_HZ, fs=SR, output="sos"), dry)


dry = scene()
out = record(dry)
waveform_to_disk(out)
```